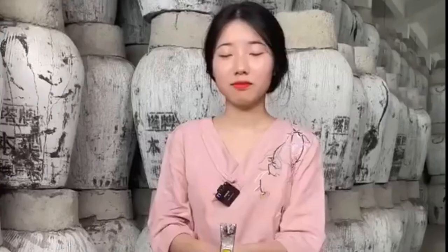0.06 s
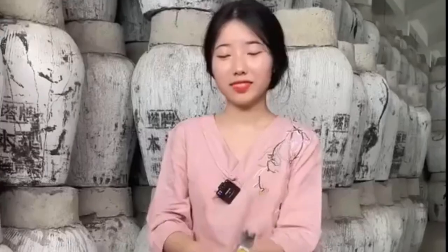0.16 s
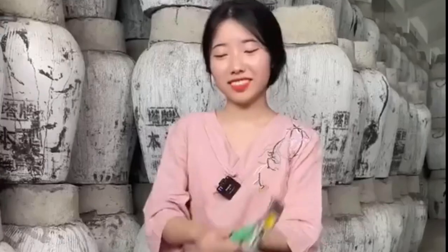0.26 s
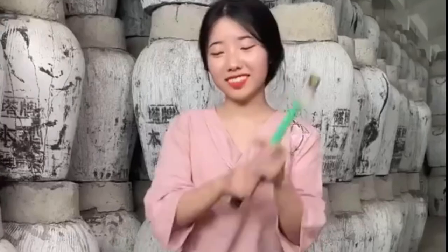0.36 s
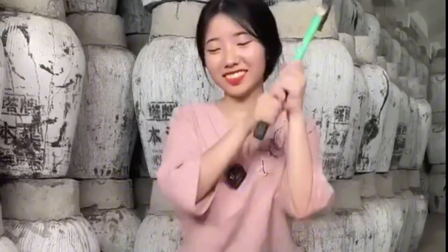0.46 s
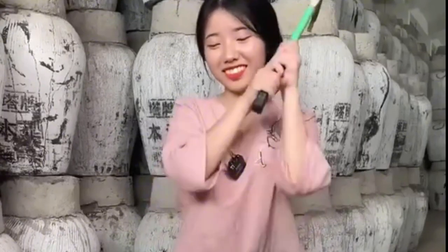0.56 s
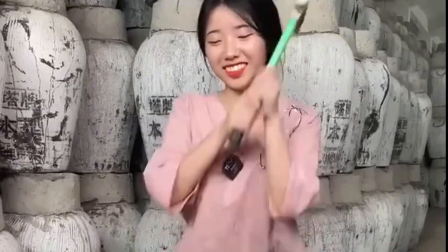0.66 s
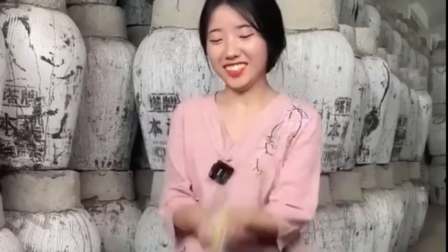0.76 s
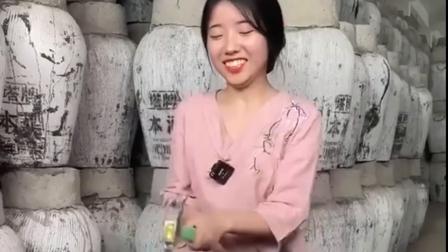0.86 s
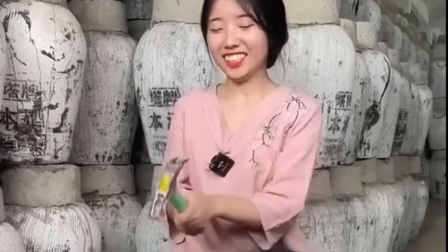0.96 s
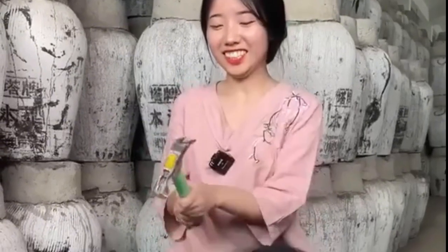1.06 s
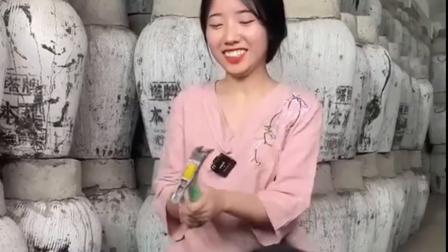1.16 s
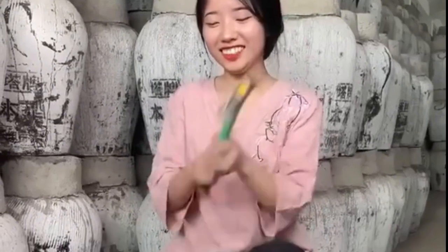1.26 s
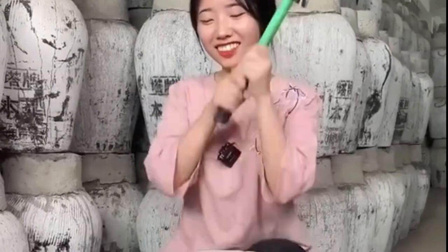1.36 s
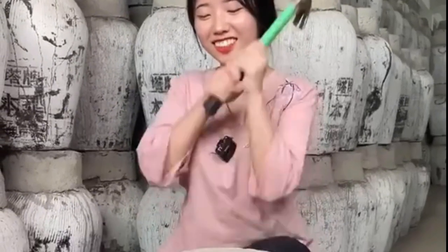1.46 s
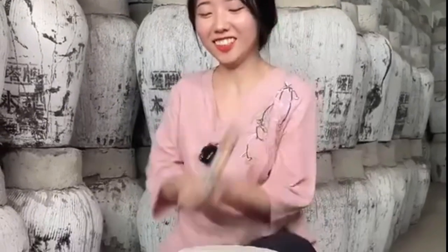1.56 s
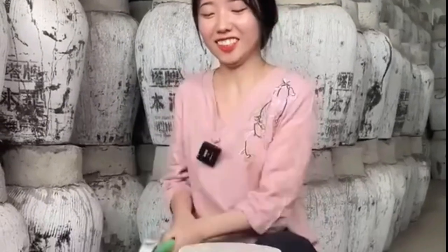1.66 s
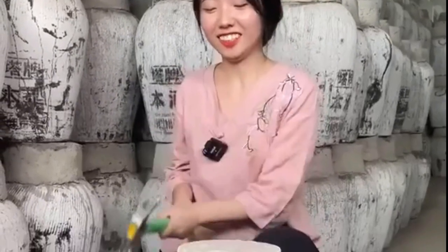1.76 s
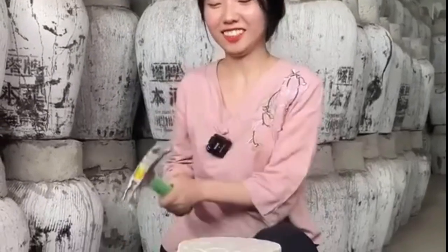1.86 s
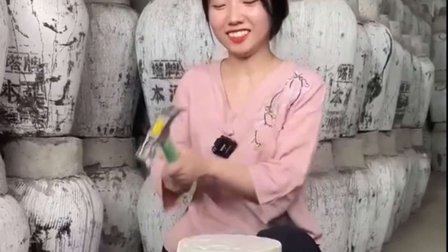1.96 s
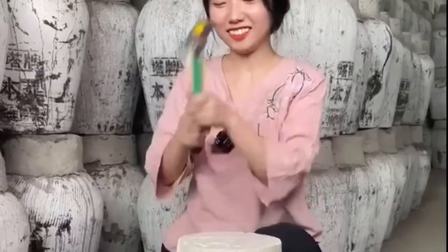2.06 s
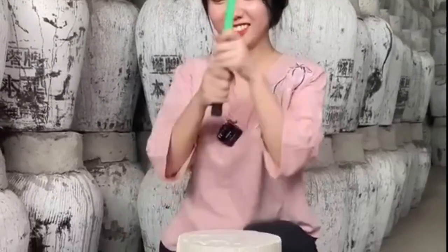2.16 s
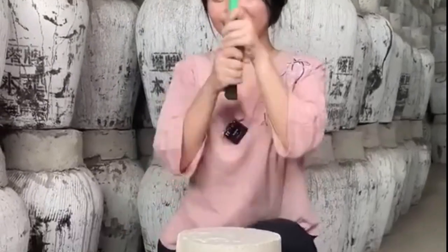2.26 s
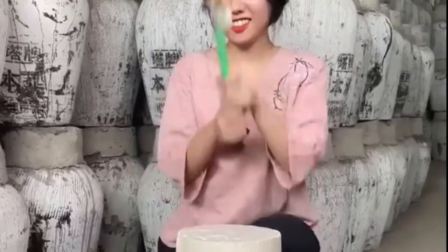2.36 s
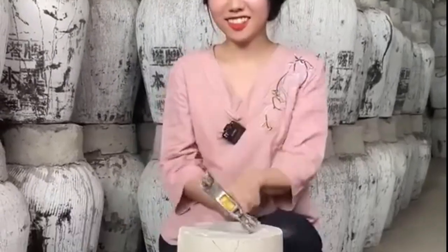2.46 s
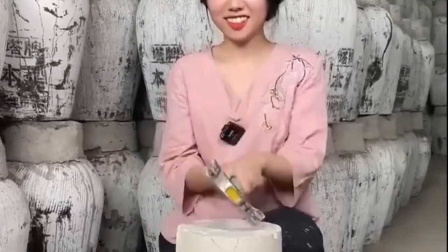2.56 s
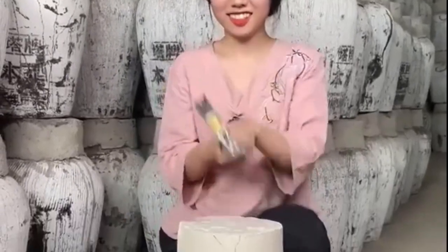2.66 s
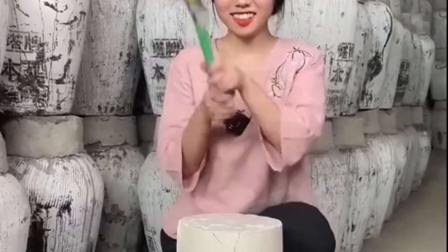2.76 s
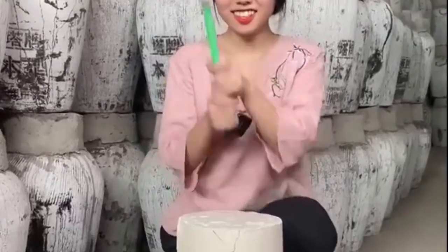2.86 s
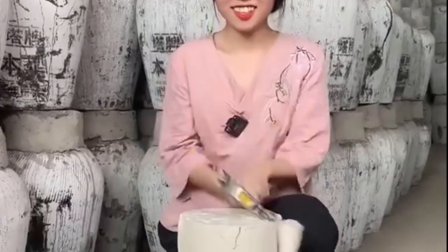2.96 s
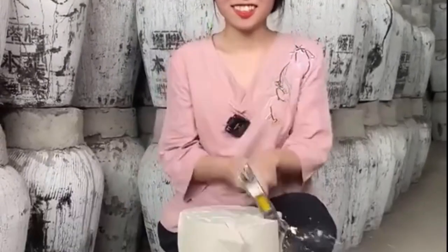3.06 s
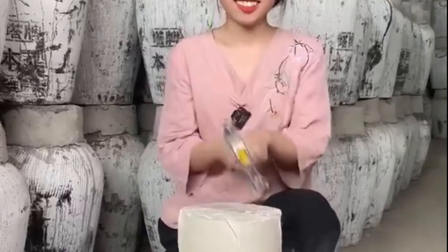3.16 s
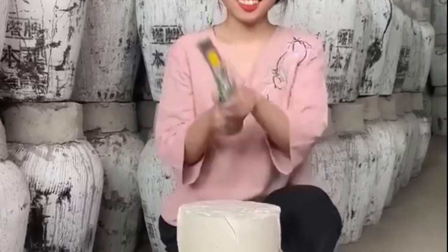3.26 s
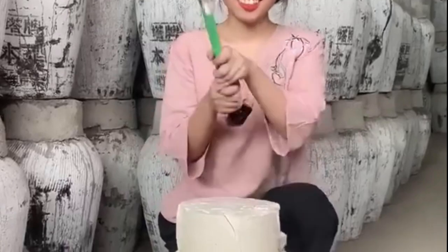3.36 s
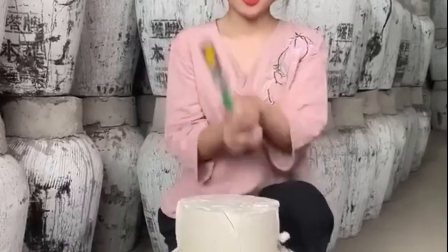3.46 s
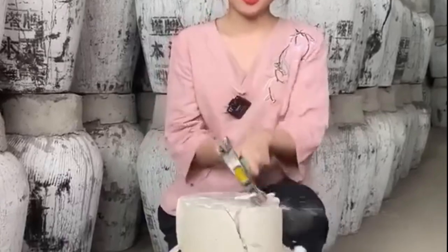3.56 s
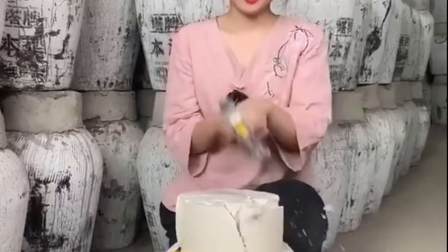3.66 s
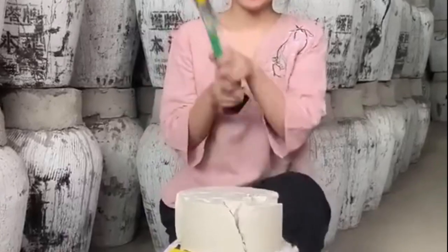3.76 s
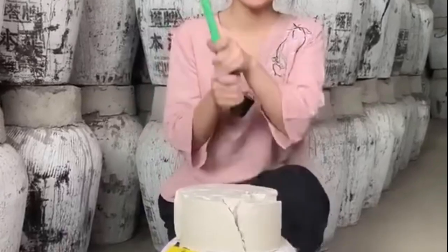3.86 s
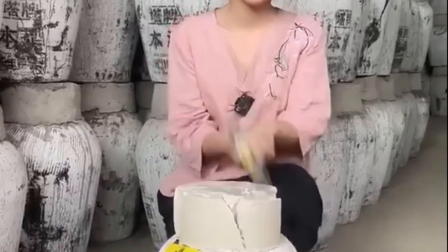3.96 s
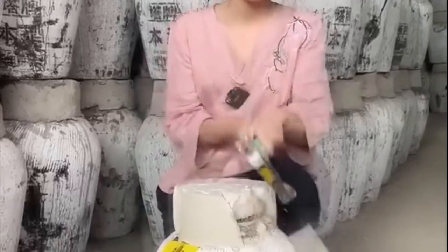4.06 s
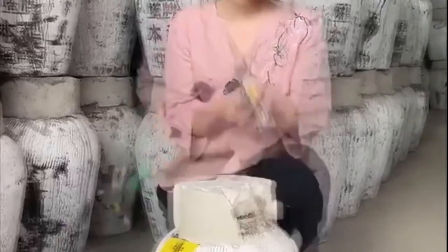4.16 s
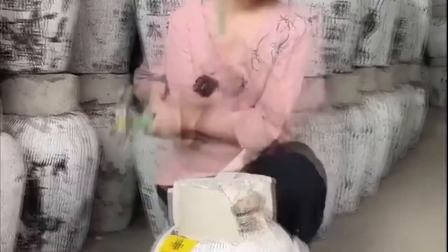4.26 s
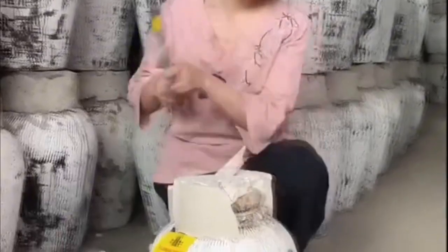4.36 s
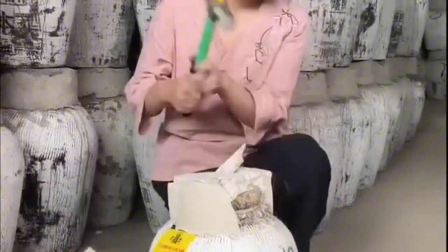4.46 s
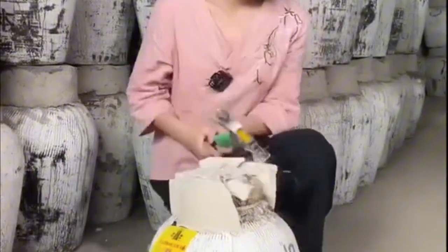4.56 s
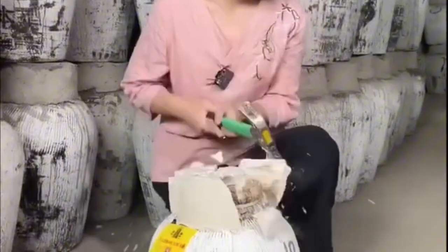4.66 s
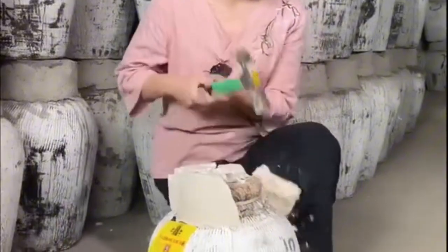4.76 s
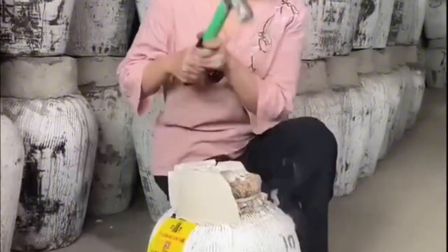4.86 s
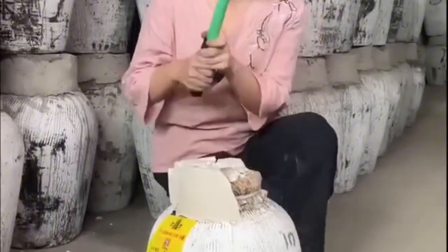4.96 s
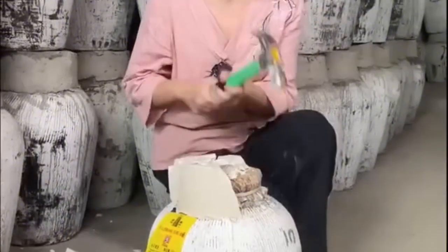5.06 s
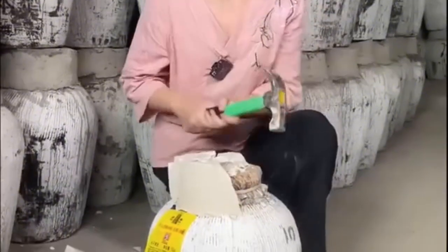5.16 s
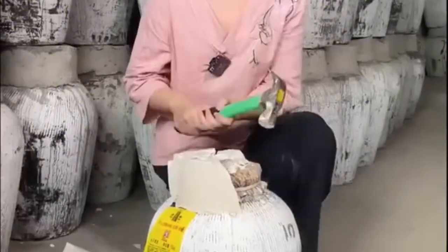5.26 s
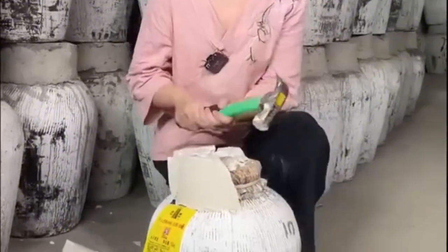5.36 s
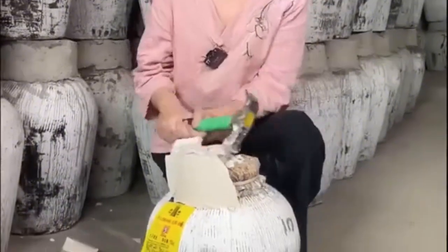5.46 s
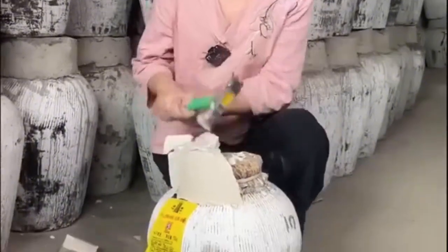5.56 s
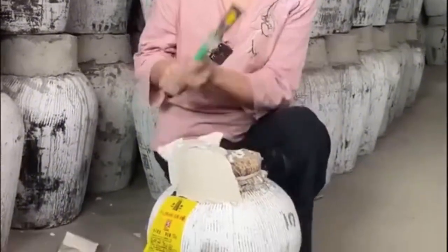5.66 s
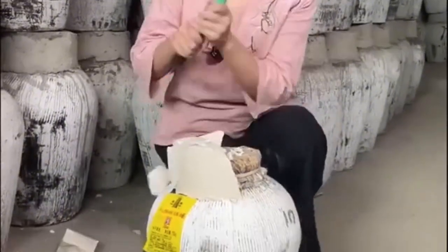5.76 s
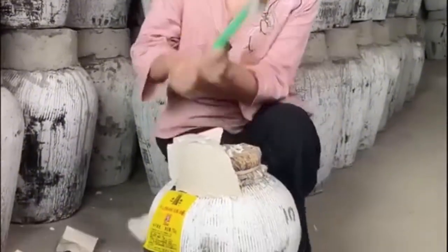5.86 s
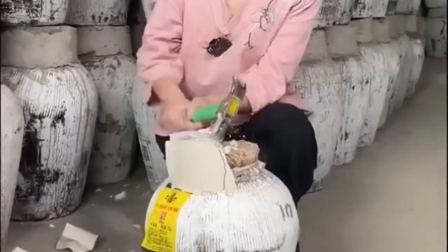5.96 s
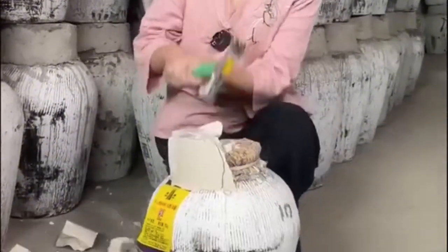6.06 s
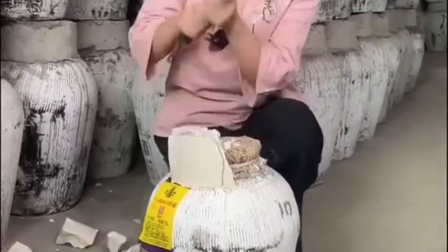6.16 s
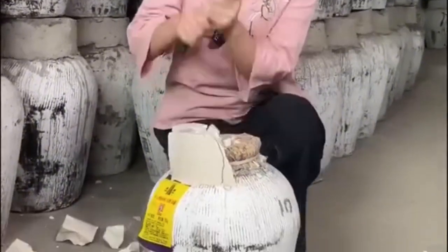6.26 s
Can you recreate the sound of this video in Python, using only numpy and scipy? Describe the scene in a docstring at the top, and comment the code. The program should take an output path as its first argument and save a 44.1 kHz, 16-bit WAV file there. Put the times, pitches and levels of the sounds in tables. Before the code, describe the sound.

Close to the jar, a steel hammer hits a hardened clay seal eight times at uneven intervals, each a loud, slightly overloaded crack with a short ceramic ring and low thud. The first rings longest; later ones are duller as the seal breaks, with lumps thumping, chips clicking and crumbs trickling. A bare storeroom echoes for about a second over a faint low hum of air.

```python
"""A steel hammer knocks the hardened clay seal off a big ceramic jar in a bare storeroom.
The microphone is worn just above the jar: each blow is a noisy crack, a ringing set of jar modes and a low thud.
Short clicks, dull thumps and clinks are bursts and modes; crumbs trickle, and sleeves rub near the microphone.
Decaying noise makes the room's echo, steady coloured noise its air; blows overload the microphone.
The treble above 4.3 kHz differs between the channels."""
import sys
import numpy as np
from scipy import signal
from scipy.fft import rfft, irfft
from scipy.io import wavfile
from scipy.ndimage import uniform_filter1d

SR = 44100
rng = np.random.default_rng(int(sys.argv[2]) if len(sys.argv) > 2 else 0)


def output_pcm(signal):
    """Save a mono or channel-first signal as 16-bit PCM at the path in sys.argv[1].

    Samples are clipped to [-1, 1] before scaling.
    """
    pcm = np.clip(np.atleast_2d(signal).T, -1, 1) * 32767
    wavfile.write(sys.argv[1], SR, np.round(pcm).astype(np.int16))


N = 278712

# All levels in the tables are relative.
# hammer blows: start_s, crack_db, crack_t60_s, jar_db, lowest_note_boost_db, thud_db, room_send_db,
# favoured_mode_hz, favoured_boost_db, side_treble_db
BLOWS = [(0.7372, 8, 0.34, 4.5, 7, -4.5, -0.5, 2570, -0.5, -3),
         (1.5510, 13, 0.08, 3, 10, -8.5, -1.5, 2260, -2, -40),
         (2.4131, 11, 0.072, 0.5, 4, -1.5, -1.5, 1690, 10, -20),
         (2.9183, 10, 0.066, -3.5, 5.5, 0, -2, 1900, 16, -12),
         (3.478, 0, 0.087, -9, 4.5, -5.5, 1, 2060, 5.5, -7),
         (3.9390, 6, 0.079, -4.5, -2.5, -3, 2.5, 2050, 3.5, -9),
         (4.5286, 9.5, 0.083, -1.5, 3, 0, -2, 2300, 7.5, -9),
         (5.9032, 5, 0.099, -9.5, 7.5, -2, -5, 2500, 7, -33)]
# modes of the struck jar: pitch_hz, level_db, t60_s
JAR_MODES = [(1088, -5, 0.41), (1086, -21.5, 0.97), (1104.6, -1.5, 0.15), (1244, -16.5, 0.64),
             (1277, -13.5, 0.46), (1410, -44, .25), (1553, -14.5, 0.39), (1574, -7, 0.21), (1701, 0, 0.17),
             (1697, -9, 0.24), (2136, 1, 0.19), (2124, -8, 0.25), (2256, 5, 0.12), (2377, -5.5, 0.12),
             (2465, 0.5, 0.13), (2540, -5.5, 0.28), (2485, -1, 0.26), (2615, 4.5, 0.092), (3030, 1, 0.15),
             (3050, -16, 0.19), (3112, 4, 0.075), (3350, -26, 0.14), (3440, -2, 0.14), (4220, -19, 0.3),
             (4570, -23, 0.41)]
# crack of steel on clay: frequency_hz, density_db_per_hz
CRACK_COLOUR = [(30, -7.5), (120, -6.5), (250, 1.5), (500, 4), (800, 4.5), (1400, -0.5), (2400, 2),
                (2800, -1.5), (3300, -3.5), (4200, -6.5), (6000, -12.5), (9000, -23.5), (13000, -41.5)]
# thud of the jar's bulk: frequency_hz, density_db_per_hz
THUD_COLOUR = [(30, -40), (65, -28), (105, -1.5), (200, -5.5), (370, 10), (550, -3), (900, -8), (2000, -57),
               (13000, -61)]
# dull thumps, lumps of clay landing or the microphone bumping on cloth:
# start_s, level_db, pitch_ratio (to the jar's thud)
THUMPS = [(3.115, -7.5, 0.88), (3.215, -14, 0.6), (4.075, 0, 1.18), (4.209, -7, 1.85), (4.930, 2.5, 1.9),
          (5.4131, -0.5, 1.19), (5.649, -14, 0.69), (5.739, -16.5, 0.69), (5.954, -7.5, 1.73),
          (5.990, 3, 1), (6.039, -5, 1.05)]
# short bright clicks, clay chips and two noisy clinks of the hammer steel: start_s, level_db, t60_s
CLICKS = [(1.755, -11, 0.11), (1.778, -12, 0.021), (3.177, -21.5, 0.025), (3.303, -25.5, 0.074),
          (3.697, -28, 0.007), (4.0745, -9, 0.0077), (4.1265, -8, 0.094), (4.2835, -27, 0.053),
          (4.3453, -5.5, 0.015), (4.3994, -34, 0.057), (4.844, -7, 0.037), (4.8912, -15, 0.0082),
          (4.9316, 7, 0.004), (4.9897, -29, 0.023), (5.4133, -7, 0.062), (5.5806, -28, 0.012),
          (5.6229, -20, 0.011), (5.718, -54, 0.014), (6.266, -49, 0.013)]
# hard, ringing contacts: start_s, level_db, pitch_ratio (to the clink modes)
CLINKS = [(1.7274, 0, 0.99), (3.1784, -27, 1.31), (3.314, -23, 1.787), (4.2822, -36, 1.2),
          (4.9864, -40, 1.2)]
# modes of a clink: pitch_hz, level_db, t60_s
CLINK_MODES = [(3350, 1.5, 0.02), (3800, -12, 0.054), (4520, -7, 0.025), (4770, -9.5, 0.094),
               (5000, -7, 0.12), (5080, 5.5, 0.041), (8300, -7.5, 0.075), (11800, -31, 0.06),
               (12390, -28, .06)]
# crumbs spilling as the seal breaks: start_s, level_db, t60_s
SPILLS = [(3.12, -42.5, 5.4), (3.95, -50, 4), (4.32, -37, 0.51), (4.6, -22.5, 0.27), (5.419, -16.5, 0.22),
          (5.56, -41, 2.5), (6.0, -37.5, 5.1)]
# sleeves rubbing near the microphone: start_s, length_s, level_db
RUBS = [(1.215, 0.42, -41.5), (3.08, 0.13, -28.5), (4.083, 0.19, -31), (5.51, 0.3, -30.5),
        (5.987, 0.11, -27.5)]
# low rubbing of cloth: frequency_hz, density_db_per_hz
CLOTH_COLOUR = [(30, -54), (70, -2), (120, 8), (300, -2.5), (450, 3.5), (700, -46), (2000, -47),
                (13000, -70)]
# how long the storeroom answers: frequency_hz, t60_s
ROOM_T60 = [(60, 2), (150, 1.48), (400, 1.2952), (1000, 1.33), (2500, 0.864), (5000, 0.86), (8000, 0.5),
            (13000, 0.45)]
# colour of the storeroom's echo: frequency_hz, level_db
ROOM_COLOUR = [(30, -20), (110, 7), (300, -1), (700, -3), (1500, -2.5), (3000, -2.5), (6000, -4),
               (13000, 6.5)]
# steady background: frequency_hz, density_db_per_hz
AIR_COLOUR = [(15, -53), (25, -33), (95, 10.5), (156, -10), (237, -2.5), (333, -4.5), (770, -11),
              (925, -14), (1050, -13.5), (2850, -26), (3510, -18.5), (3800, -18.5), (6250, -18.5),
              (9750, -32.5), (13000, -41)]

LOWEST_NOTE_TOP_HZ = 1200
# brightness of a click at 0 dB (dB per octave), and its rise for each dB less
CLICK_TILT_DB, CLICK_TILT_PER_DB = -0.5, 0.46
GRIT_DB, GRIT_T60_S = -25.5, 0.22  # grit ground off by every blow, relative to its crack
SPILL_RISE_S = 0.015
RUB_ATTACK_S, RUB_RELEASE_T60_S = 0.087, 1
AIR_DB = -42
CUTOFF_HZ = 13200


def hammer(crack_tilt_db=0.44, thud_t60=0.24, ring_db=-2, scatter_db=3.0, detune=0.002,
           ring_room_db=-7, thud_room_db=0):
    """Steel cracks on clay and excites the jar's modes, favouring those near the spot that is hit.

    Returns the blows as heard directly, as sent into the room and as sent to the channel difference.
    """
    direct, sent, side_sent = np.zeros((3, N))
    hz, mode_db, t60 = np.transpose(JAR_MODES)
    for blow in BLOWS:
        start_s, crack_db, crack_t60, jar_db, lowest_db, thud_db, room_db, spot_hz, boost_db, side_db = blow
        octaves_away = np.log2(hz / spot_hz)
        favour = np.exp(-(octaves_away / 0.13) ** 2)
        spot_db = boost_db * favour + lowest_db * (hz < LOWEST_NOTE_TOP_HZ)
        strength_db = mode_db + jar_db + ring_db + spot_db + rng.normal(0, scatter_db, len(hz))
        # the cracking seal loads the jar a little differently at every blow
        blow_hz = hz * rng.normal(1, detune, len(hz))
        jar = ring(blow_hz, strength_db, t60)
        crack = from_db(crack_db) * burst(CRACK_COLOUR, crack_t60, crack_tilt_db)
        thud = from_db(thud_db) * burst(THUD_COLOUR, thud_t60)
        for part, part_room_db in ((crack, 0), (jar, ring_room_db), (thud, thud_room_db)):
            send_db = room_db + part_room_db
            add(direct, start_s, part)
            add(sent, start_s, from_db(send_db) * part)
            add(side_sent, start_s, from_db(send_db + side_db) * part)
    return direct, sent, side_sent


def thumps(t60=0.045, contact_s=0.0019):
    """Soft contacts take a moment to build a low, damped thump; higher thumps are shorter."""
    out = np.zeros(N)
    soft_contact = 1 - np.exp(-seconds(SR // 2) / contact_s)
    for start_s, level_db, pitch in THUMPS:
        thump = burst(THUD_COLOUR, t60 / pitch, pitch=pitch) * soft_contact
        add(out, start_s, from_db(level_db) * thump)
    return out


def clicks(chink_db=-24):
    """Hard contacts give short noisy clicks with a faint chink; the quieter ones are brighter."""
    out = np.zeros(N)
    for start_s, level_db, t60 in CLICKS:
        tilt_db = CLICK_TILT_DB - CLICK_TILT_PER_DB * level_db
        click = burst(CRACK_COLOUR, t60, tilt_db)
        add(out, start_s, from_db(level_db) * click)
        add(out, start_s, chink(level_db + chink_db + tilt_db))
    return out


def clinks(tick_db=-6.0, tick_t60=0.025):
    """Hard pieces meet with a tick and a high ring; smaller pieces ring higher."""
    out = np.zeros(N)
    hz, mode_db, t60 = np.transpose(CLINK_MODES)
    for start_s, level_db, ratio in CLINKS:
        clink_hz = np.minimum(hz * ratio, 0.45 * SR)
        add(out, start_s, ring(clink_hz, mode_db + level_db, t60))
        tick = burst(CRACK_COLOUR, tick_t60, tilt_db=11.5)
        add(out, start_s, from_db(level_db + tick_db) * tick)
    return out


def crumbs(per_s=170, spread_db=6, kinds=8):
    """Tiny uneven grains tick and chink at random: grit gushes at each blow, and spills die away."""
    size_db = spread_db * np.minimum(rng.exponential(1, N), 3)
    sizes = from_db(size_db) * rng.choice([-1, 1], N)
    ticks = sizes * (rng.random(N) < per_s / SR)
    kind = rng.integers(0, kinds, N)
    trickle = np.zeros(N)
    for k in range(kinds):
        grain = burst(CRACK_COLOUR, 0.018, tilt_db=7.5 + rng.normal())
        add(grain, 0, chink(-22.5, t60=0.067))
        trickle += signal.oaconvolve(ticks * (kind == k), grain)[:N]
    grit = [(start_s, crack_db + GRIT_DB, GRIT_T60_S) for start_s, crack_db, *_ in BLOWS]
    flow = np.zeros(N)
    for start_s, level_db, t60 in [*SPILLS, *grit]:
        elapsed = since(start_s)
        rise = 1 - np.exp(-elapsed / SPILL_RISE_S)
        flow += from_db(level_db) * rise * dying(elapsed, t60)
    return trickle / trickle.std() * flow


def cloth(bumps_per_s=35, bump_db=-3, bump_t60=0.081, bump_pitch=0.61):
    """Each arm movement swells, holds and fades: a low rubbing, with soft bumps as folds catch and slip."""
    motion = np.zeros(N)
    for start_s, length_s, level_db in RUBS:
        swell = np.minimum(since(start_s) / RUB_ATTACK_S, 1)
        fade = dying(since(start_s + length_s), RUB_RELEASE_T60_S)
        motion += from_db(level_db) * swell * fade
    slips = rng.standard_normal(N) * (rng.random(N) < bumps_per_s / SR)
    bump = burst(THUD_COLOUR, bump_t60, pitch=bump_pitch)
    bumps = signal.oaconvolve(slips, bump)[:N]
    return motion * (noise(CLOTH_COLOUR) + from_db(bump_db) * bumps / bumps.std())


def storeroom(x, build_s=0.0023, cluster_db=2.5):
    """Echoes off the stacked jars arrive in clusters and thicken into a tail whose treble dies first."""
    t = seconds(2 * SR)
    hz = np.arange(SR + 1) / 2
    white = rfft(rng.standard_normal(len(t))) / np.sqrt(SR)
    centres = np.geomspace(40, 14000, 18)
    tail = np.zeros(len(t))
    # overlapping bands, each with its own level and decay
    for centre, share in zip(centres, np.eye(len(centres))):
        band = irfft(white * np.interp(hz, centres, share))
        tail += band * from_db(at_hz(ROOM_COLOUR, centre)) * dying(t, at_hz(ROOM_T60, centre))
    clusters = uniform_filter1d(rng.standard_normal(len(t)), size=400)
    tail = tail * from_db(cluster_db * clusters / clusters.std())
    build = 1 - np.exp(-t / build_s)
    return signal.fftconvolve(x, tail * build)[:N]


def air():
    """Steady background: unchanging coloured noise."""
    return from_db(AIR_DB) * noise(AIR_COLOUR)


def burst(spectrum, t60, tilt_db=0, pitch=1):
    """Countless heavily damped modes struck at once, as decaying noise."""
    t = seconds(SR // 2)
    # the decay is shared out before and after colouring; together they give t60
    hit = rng.standard_normal(len(t)) * dying(t, 1.5 * t60)
    return colour(hit, spectrum, tilt_db, pitch) * dying(t, 3 * t60)


def ring(hz, db, t60):
    """A few clear modes struck at once; they sound until the longest has died."""
    t = seconds(int(1.5 * SR * t60.max()))
    phase = 2 * np.pi * rng.random((len(hz), 1))
    modes = np.sin(2 * np.pi * hz[:, None] * t + phase) * dying(t, t60[:, None])
    return from_db(db) @ modes


def chink(db, t60=0.02, count=7):
    """A hard contact rings briefly at a few high pitches of its own."""
    hz = rng.uniform(4460, 12000, count)
    mode_db = db + rng.normal(0, 0.6, count)
    return ring(hz, mode_db, t60 * (0.5 + rng.random(count)))


def noise(spectrum):
    """Steady noise of a given colour; rms about 1."""
    return colour(rng.standard_normal(N), spectrum)


def colour(sound, spectrum, tilt_db=0, pitch=1):
    """Give a sound a smooth spectrum, tilted about 1.5 kHz and moved in pitch; its energy stays."""
    hz = np.arange(len(sound) // 2 + 1) * SR / len(sound)
    octaves = np.log2(np.maximum(hz, 300) / 1500)
    gain = from_db(at_hz(spectrum, hz / pitch) + tilt_db * octaves) * (hz > 20)
    phase = np.angle(rfft(sound))
    out = irfft(gain * np.exp(1j * phase), len(sound))
    return out * sound.std() / out.std()


def from_db(db):
    """Decibels to amplitude."""
    return 10 ** (np.asarray(db) / 20)


def at_hz(points, hz):
    """Read a table on a log-frequency axis."""
    table_hz, values = np.transpose(points)
    return np.interp(np.log(hz + 1), np.log(table_hz), values)


def seconds(size):
    """Time of every sample from zero."""
    return np.arange(size) / SR


def since(s):
    """Seconds since a moment, for every sample; zero before it."""
    return np.maximum(seconds(N) - s, 0)


def dying(t, t60):
    """Exponential decay, down 60 dB after t60 seconds."""
    return np.exp(-np.log(1000) * t / t60)


def add(track, s, sound):
    """Mix a sound into the track at a time."""
    i = round(s * SR)
    track[..., i:i + sound.shape[-1]] += sound[..., :N - i]


def scene(blow_echo_db=4.5, click_echo_db=3, thump_echo_db=2, clink_echo_db=3, small_side_db=-8,
          air_side_db=-5):
    """Everything reaches a microphone worn just above the jar; treble above 4.3 kHz differs between channels."""
    blows, sent, side_sent = hammer()
    thump, click, clink = thumps(), clicks(), clinks()
    small_sent = from_db(click_echo_db) * click + from_db(thump_echo_db) * thump
    small_sent = small_sent + from_db(clink_echo_db) * clink
    echo = storeroom(from_db(blow_echo_db) * sent + small_sent)
    # crumbs and cloth are heard without echo
    mid = blows + thump + click + clink + crumbs() + cloth() + echo + air()

    side_input = from_db(blow_echo_db) * side_sent + from_db(small_side_db) * small_sent
    difference = storeroom(side_input, build_s=0.075) + from_db(air_side_db) * air()
    treble_only = signal.ellip(8, 0.5, 70, 4300, "high", fs=SR, output="sos")
    side_treble = signal.sosfilt(treble_only, difference)
    return mid + side_treble * [[1], [-1]]


def record(dry, top=0.64, hardness=5):
    """The blows overload the microphone, both channels together; the top is cut."""
    drive = np.abs(dry.mean(axis=0) / top)
    loud = dry / (1 + drive ** hardness) ** (1 / hardness)
    top_cut = signal.ellip(10, 0.05, 50, CUTOFF_HZ, fs=SR, output="sos")
    return signal.sosfilt(top_cut, loud)


dry = scene()
out = record(dry)
output_pcm(out)
```